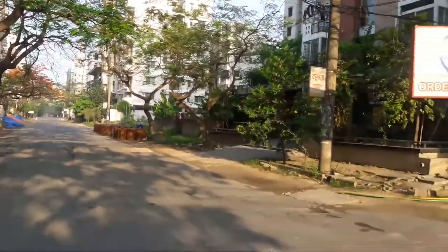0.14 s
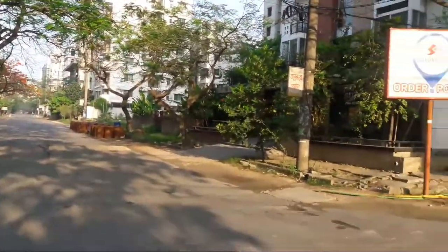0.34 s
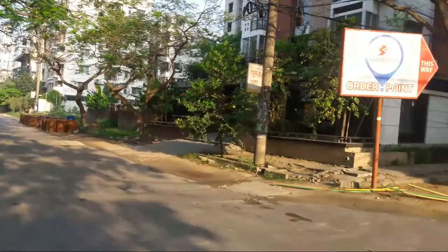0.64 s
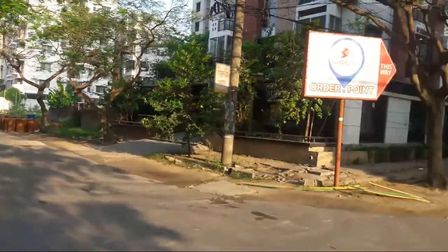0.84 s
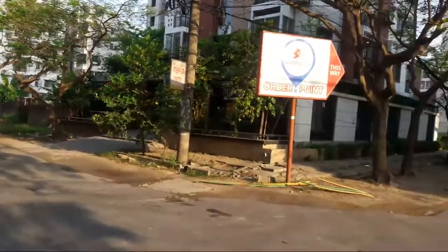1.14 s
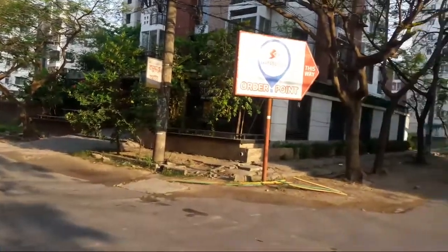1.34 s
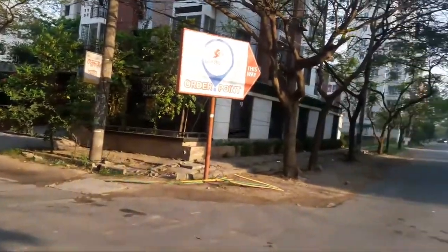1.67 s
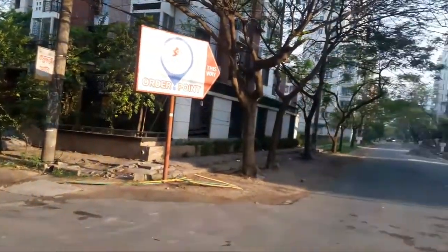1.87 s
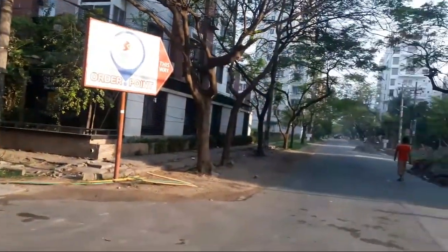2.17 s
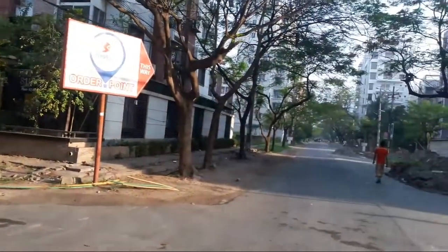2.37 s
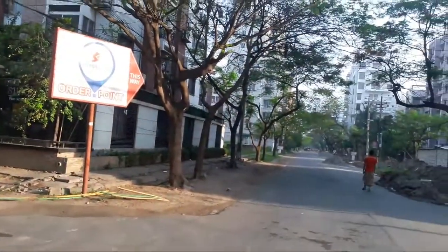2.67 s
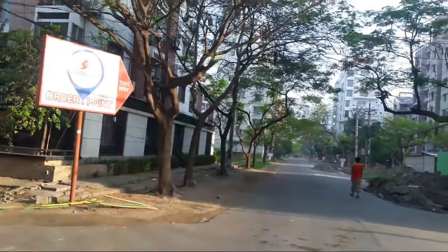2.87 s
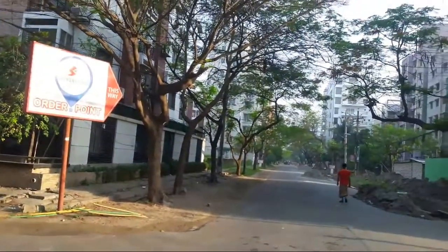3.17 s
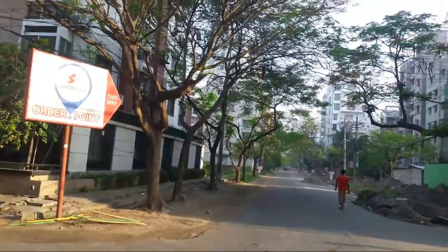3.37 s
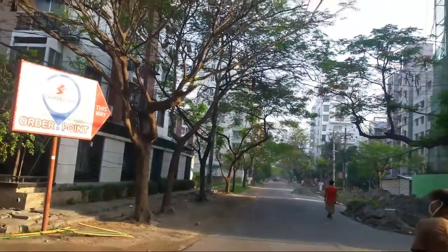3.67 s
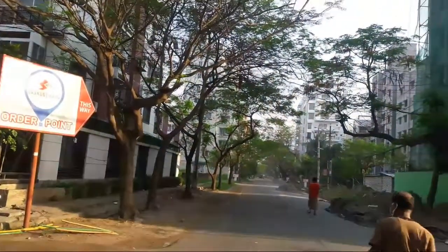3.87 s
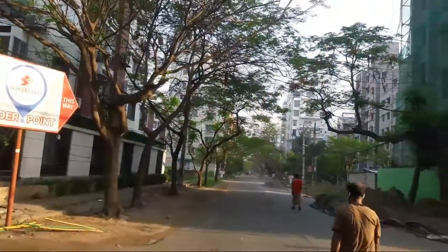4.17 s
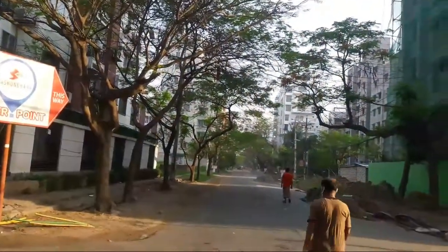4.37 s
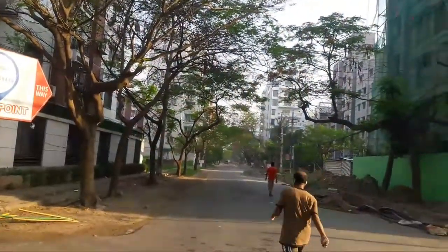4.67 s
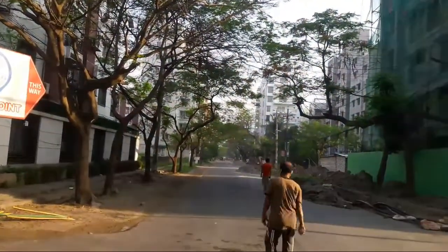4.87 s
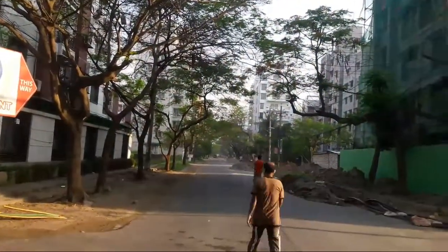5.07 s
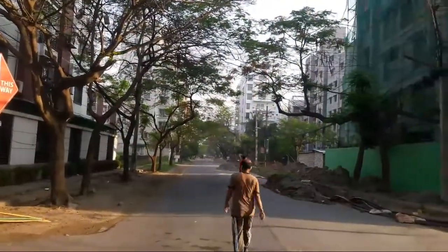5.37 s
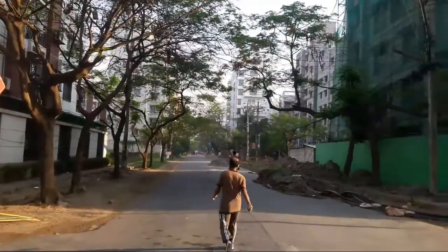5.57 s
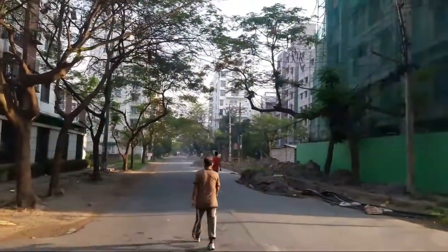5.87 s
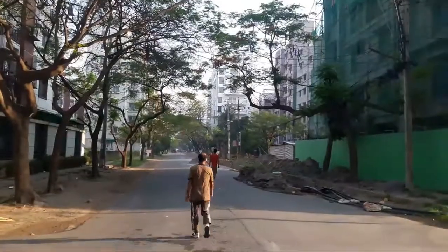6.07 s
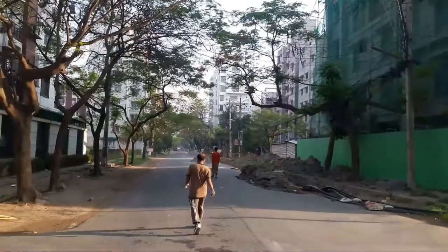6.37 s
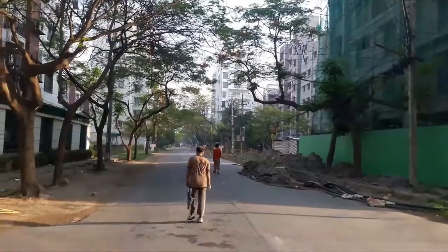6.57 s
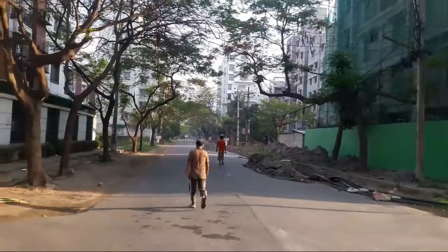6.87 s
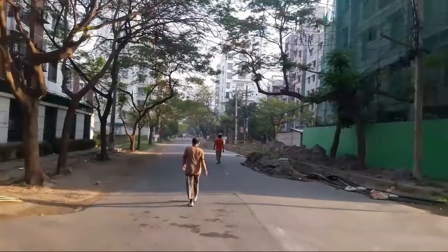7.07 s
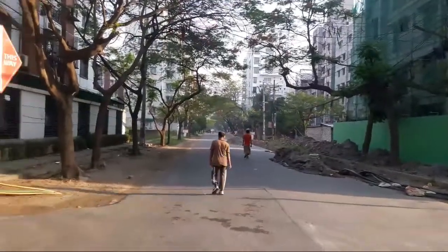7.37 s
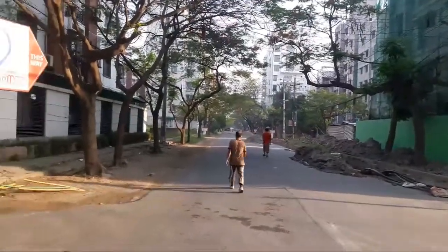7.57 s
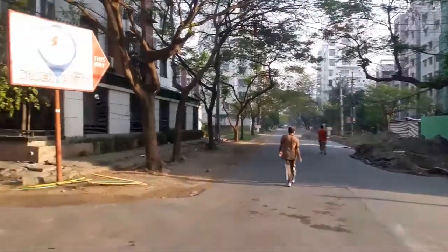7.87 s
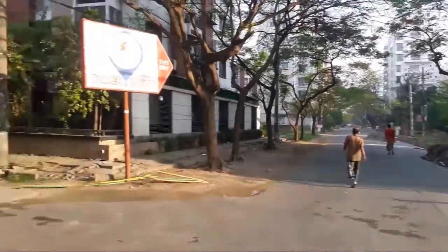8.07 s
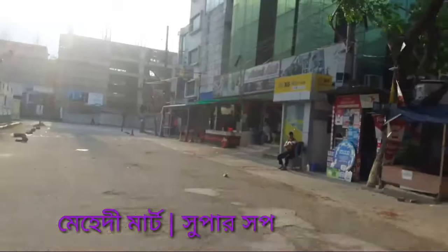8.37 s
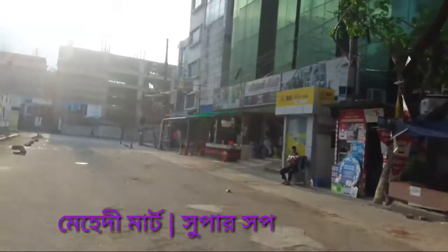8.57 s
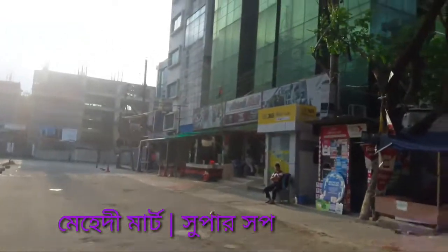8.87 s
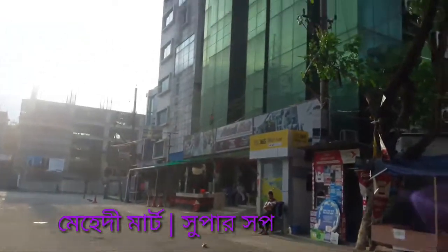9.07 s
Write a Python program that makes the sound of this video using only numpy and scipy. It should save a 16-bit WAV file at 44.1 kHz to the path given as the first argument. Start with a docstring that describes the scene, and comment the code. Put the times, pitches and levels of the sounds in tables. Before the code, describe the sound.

Hoarse sparrow chirps and thin peeps fill a calm tree-lined street, with soft knocks and ticks nearby, before a brief dip and loud wind buffeting.

```python
"""Sparrows and small birds chirp in the trees of a quiet street; house fronts echo, a far hum lies below.
Each note is a gliding near-sine, roughened by noise and a throb. From about 2 s a breeze, lumpy low
noise, buffets the microphone; ticks, knocks and scuffs, short rings and noise bursts, fall close by.
Near 8.6 s the street fades out; a second, windier street of shaped noise fades in under a strong gust
with sharp pops, while a few birds call without echo."""
import sys
import numpy as np
from scipy import signal
from scipy.fft import rfft, irfft, next_fast_len
from scipy.io import wavfile
from scipy.ndimage import uniform_filter1d

SR = 44100
rng = np.random.default_rng(int(sys.argv[2]) if len(sys.argv) > 2 else 0)


def bounce(signal):
    """Save signal as a 16-bit WAV file at the path given by the first command-line argument."""
    frames = np.transpose(np.atleast_2d(signal))
    limited = np.clip(frames, -1, 1)
    pcm = np.round(limited * 32767).astype(np.int16)
    wavfile.write(sys.argv[1], SR, pcm)


N = 406602

# Levels in dB are those at the source, before echo and overall tone.
# Near sparrow's chirps. Each row: start in seconds, then crest, rise, sweep and closing upstroke in dB.
CHIRPS = [(0.427, -45.5, -45, -47, -43.5), (1.074, -38, -51, -51, -44.5), (2.017, -35, -41.5, -36, -36.5),
          (2.636, -35, -38, -39, -40.5), (3.516, -37.5, -36, -39, -34.5), (4.371, -35.5, -36.5, -43, -35.5),
          (4.727, -40, -34.5, -34, -33), (5.918, -36, -43, -46.5, -49), (6.427, -30, -37, -37, -40),
          (7.134, -36, -41, -44, -48.5), (8.091, -25.5, -43, -38.5, -38)]
# Crest, rise, fall, closing upstroke, its overtone, second voice.
# Each row: delay in seconds, length in seconds, start, middle and end pitch in Hz.
CHIRP_PARTS = [(.019, .023, 6700, 7050, 6600), (.002, .023, 3600, 5450, 6800),
               (.028, .046, 4700, 3740, 3800), (.091, .028, 3650, 4200, 5300),
               (.091, .022, 6300, 6900, 7400), (.004, .018, 3750, 4300, 5100)]
# Answering sparrow, upstroke then low arch. Each row: start in seconds, upstroke in dB, arch in dB.
ANSWERS = [(1.024, -42, -50), (2.48, -38.5, -41.5), (3.344, -39.5, -33.5), (4.057, -36, -40.5),
           (4.8, -37, -33), (5.531, -37, -40), (6.211, -32, -36), (7.052, -42.5, -40.5), (8.269, -39, -35)]
# Strokes of the answer. Each holds: length in seconds, start, middle and end pitch in Hz.
UPSTROKE = (.028, 3900, 4200, 4950)
HOOK = (.03, 3900, 4000, 3250)  # lower voice that parts from the upstroke and drops into the arch
LOW_ARCH = (.046, 3200, 4230, 2800)
# Low arch on its own. Each row: start in seconds, level in dB.
LONE_ARCHES = [(0.172, -43.5), (1.774, -41), (6.364, -42.5), (7.999, -41)]
# Steep high arches of the answers. Each row: start in seconds, length in seconds, crest in Hz, level in dB.
HIGH_ARCHES = [(0.111, 0.033, 5650, -40.5), (1.003, 0.019, 6370, -43), (1.717, 0.028, 5830, -43.5),
               (4.035, 0.02, 6400, -41.5), (6.183, 0.034, 5740, -38.5), (7.035, 0.033, 6450, -43.5),
               (7.932, 0.042, 5770, -43.5), (8.245, 0.03, 5300, -48), (9.189, 0.031, 5050, -37)]
# Slides down to a hook. Each row: start in seconds, level in dB.
FALLS = [(0.13, -45), (1.098, -50), (1.738, -42.5), (4.404, -43.5), (5.487, -44), (6.135, -48),
         (7.956, -43)]
# One slide: length in seconds, start, middle and end pitch in Hz.
FALL_STROKE = (0.03, 5300, 3900, 3470)
# Quick hoarse upstrokes. Each row: start in seconds, level in dB.
CHATTER = [(6.292, -52), (6.333, -39), (9.153, -48.5), (9.171, -37.5), (9.185, -39)]
# One upstroke: length in seconds, start, middle and end pitch in Hz.
CHATTER_STROKE = (.022, 3650, 4600, 5500)
# The sparrows' throat favours two bands. Each row: frequency in Hz, gain in dB.
THROAT = [(3000, 0), (4000, 2), (5300, -3), (7000, -1)]
# Thin notes. Each row: start in seconds, length in seconds, middle and end pitch in Hz, level in dB.
PEEPS = [(0.0, 0.019, 4400, 4460, -41.5), (0.32, 0.043, 5800, 5570, -54), (0.74, .035, 5650, 5460, -48.5),
         (0.752, 0.092, 4500, 4420, -50), (0.869, 0.074, 5950, 6000, -43), (1.305, 0.055, 5670, 5410, -47),
         (1.495, 0.013, 6070, 5900, -46.5), (1.612, .019, 6600, 6400, -47), (2.407, 0.029, 5930, 5800, -47),
         (2.872, 0.038, 5980, 5570, -47), (2.93, 0.037, 4600, 5030, -48.5), (3.146, 0.038, 5420, 5800, -50),
         (3.272, 0.062, 5870, 5460, -48.5), (4.292, 0.083, 5620, 5780, -47), (4.78, 0.046, 5700, 5540, -42),
         (4.899, 0.039, 6590, 6630, -48), (5, 0.044, 5320, 5260, -45), (5.415, 0.032, 6840, 6660, -50),
         (5.44, 0.069, 6080, 5800, -45.5), (5.756, 0.053, 6840, 6040, -44), (6.095, 0.048, 6260, 6300, -47),
         (6.299, .04, 5620, 5600, -46), (6.312, 0.052, 6000, 5700, -51), (6.401, 0.037, 6900, 7000, -46),
         (7.003, 0.057, 6600, 6600, -46.5), (7.206, 0.022, 6950, 7300, -36),
         (7.391, 0.04, 5360, 5550, -49.5), (7.42, 0.02, 6150, 6400, -55), (7.85, 0.05, 6630, 6420, -44),
         (8.074, 0.035, 6800, 6740, -44), (8.442, 0.05, 5770, 5400, -41.5)]
# Quick rises. Each row: start in seconds, top pitch in Hz, level in dB.
FLICKS = [(5.756, 6860, -48), (5.843, 6570, -47.5), (8.926, 5400, -46)]
# Lower birds further off. Each row: start in seconds, length in seconds, start and end in Hz, level in dB.
WHISTLES = [(1.622, 0.043, 2000, 2060, -47), (1.675, 0.059, 2186, 2050, -41), (1.8, 0.065, 2124, 2060, -48),
            (1.852, 0.064, 2130, 2340, -48), (1.97, 0.079, 1967, 1990, -50), (2.05, 0.028, 2020, 1920, -44),
            (2.172, 0.02, 3150, 2940, -45), (3.3, 0.058, 590, 640, -53), (3.384, 0.094, 503, 544, -45),
            (5.236, 0.033, 1980, 2000, -50), (5.3, 0.028, 2035, 1987, -46.5),
            (5.356, 0.057, 1960, 1894, -49.5), (5.452, 0.033, 2005, 2020, -47),
            (5.64, 0.025, 2580, 2470, -50), (5.665, 0.057, 2060, 1890, -51),
            (7.478, 0.04, 1943, 1810, -44.5), (7.53, .025, 1830, 2020, -49),
            (7.648, 0.069, 2120, 2420, -51), (7.819, 0.072, 2640, 2400, -48),
            (7.869, 0.056, 1940, 1860, -48), (8.105, 0.037, 2000, 2140, -46),
            (8.184, .025, 1870, 1940, -45.5), (8.197, 0.078, 2470, 2420, -46),
            (8.239, 0.041, 2133, 1840, -40.5), (8.292, 0.017, 1870, 2100, -43),
            (8.379, 0.053, 2080, 1866, -48), (8.427, .045, 1845, 2140, -45.5)]
# Second street, whistles that climb and drop. Each row: start in seconds, share of the pitch, level in dB.
ARCS = [(8.794, 1.05, -47), (8.951, 1.02, -40), (9.112, .965, -41.5)]
# Climb, two overtones, drop. Each row: delay in seconds, length in seconds,
# start, middle and end pitch in Hz before the share, level in dB relative to the whistle.
ARC_PARTS = [(0, .076, 2580, 3130, 3190, 0), (0, .06, 3870, 4560, 4780, -17),
             (.012, .06, 5700, 6250, 6440, -14), (.07, .022, 3200, 2600, 2300, -3)]
# House fronts. Each row: delay in seconds, level in dB.
ECHOES = [(.03, -15), (.068, -12), (.14, -17)]
# Colour of all echoes. Each row: frequency in Hz, gain in dB.
ECHO_TONE = [(2500, -3), (4200, -3), (5300, 1), (7000, -4)]
# Far low warbling. Each row: time in seconds, level in dB, centre in Hz.
WARBLE = [(0.0, -102.5, 2120), (1.459, -58.5, 2053), (1.68, -50.5, 2077), (2.97, -70, 2090),
          (5.719, -57, 2023), (6.419, -67, 1980), (7.499, -56, 1943), (8.43, -53, 1970), (8.6, -58.5, 2010)]
# Level curves of the wind. Each row: time in seconds, level in dB.
BREEZE = [(1.9, -56.5), (2.5, -44), (3.43, -44.5), (3.89, -53), (3.98, -34), (4.39, -55), (4.55, -31.5),
          (4.68, -53), (4.79, -41), (4.93, -47.5), (5.16, -33), (5.2, -41.5), (5.59, -30), (5.84, -47.5),
          (5.96, -32.5), (6.48, -39), (6.68, -29.5), (6.71, -37), (6.89, -32.5), (6.93, -43.5), (7.16, -38),
          (7.6, -53.5), (7.68, -33), (7.76, -61), (7.92, -40.5), (8.3, -78)]
GUST = [(8.708, -45), (8.75, -33), (8.86, -20), (8.92, -20.5), (9.04, -8), (9.11, -8), (9.14, -18.5),
        (9.18, -11.5), (9.22, -17.5)]
# Wind spectra. Each row: frequency in Hz, relative density in dB per Hz.
BREEZE_TONE = [(15, -65.5), (25, -25.5), (74, -1), (130, 0), (292, -11.5), (517, -33), (557, -29.5),
               (900, -39.5), (1170, -70), (1980, -120)]
GUST_TONE = [(15, -73), (25, -32), (75, -6.5), (168, 0.5), (204, 0.5), (238, -2.5), (441, -7), (477, -10),
             (662, -13.5), (2500, -58), (3250, -103), (5500, -120)]
# Sharp pops within the gust. Each row: start in seconds, peak in dB.
POPS = [(8.832, -31.5), (8.9047, -25.5), (8.922, -27), (8.975, -22.5), (9.03, -22), (9.0553, -23),
        (9.074, -29), (9.1014, -29), (9.181, -24.5)]
# Dry ticks near the microphone. Each row: start in seconds, level in dB, centre in Hz, t60 in seconds.
TICKS = [(0.612, -38, 4500, .012), (2.2675, -42, 4170, .015), (3.0497, -36.5, 6570, 0.014),
         (3.1027, -36, 6600, .015), (4.348, -35, 6750, .02), (4.3515, -20, 6700, 0.025),
         (4.4432, -30, 6000, 0.019), (4.4517, -29, 6200, 0.024), (5.189, -44, 6450, .03),
         (5.261, -36.5, 2440, .015), (6.013, -31.5, 6530, 0.024), (7.442, -20, 4100, 0.0057)]
# Dull knocks near the microphone. Each row: start in seconds, level in dB, pitch in Hz.
KNOCKS = [(2.267, -38, 480), (2.679, -29.5, 402), (3.1, -36, 460), (3.217, -35, 505), (3.53, -29.5, 346),
          (7.439, -33.5, 363.5)]
# Swelling hiss, perhaps a shoe on grit. Each row: start in seconds, length in seconds, level in dB.
SCUFFS = [(4.376, 0.13, -33), (7.452, .037, -33)]
# Spectra of scuffs, first street, second street. Each row: frequency in Hz, relative density in dB per Hz.
SCUFF_TONE = [(2500, -20), (5000, 1), (10000, -6), (15500, 11)]
STREET = [(18, -48), (30, -24), (43, -16.5), (93, -1.5), (147, -9), (194, -4), (250, -8.5), (322, -7),
          (996, -15.5), (2280, -12.5), (3080, -18), (3800, -17), (4300, -11.5), (4850, -17.5),
          (6590, -16.5), (7400, -27.5), (9620, -58), (16300, -120)]
SQUARE = [(880, -58), (1500, -18), (2630, -17.5), (3280, -24), (3920, -26.5), (4640, -29), (7400, -18.5),
          (9620, -57), (16300, -120)]
# Hum and whine. Each row: frequency in Hz, level in dB.
HUM = [(96.9, -61.5), (199.2, -53.5), (1380, -65)]
# Overall tone, a steep dip near 8.6 kHz. Each row: frequency in Hz, gain in dB.
OVERALL_TONE = [(7100, -1), (7500, -5.5), (7900, -16.5), (8600, -33.5), (9200, -11), (16000, -39)]
# Spectrum of the faint top hiss. Each row: frequency in Hz, relative density in dB per Hz.
TOP_HISS = [(7900, -32), (8500, -4), (9000, -6), (12000, -6.5), (15500, -9.5)]

HOARSE, THIN, CLEAR = .52, .42, .17  # roughness of sparrows, peeps, whistles
THROB_HZ = 190  # rate in Hz of the throb that roughens the notes
OCTAVE_DB, TWELFTH_DB = -20.5, -17.5  # second and third harmonics
FALL_DB, OVERTONE_DB, SECOND_VOICE_DB = -6, -13.5, -5  # against sweep, closing upstroke, sweep
HOOK_DB, ARCH_DELAY_S = -3, .026  # against and after the upstroke
ARCH_FROM, ARCH_TO = .67, .64  # start and end pitch as shares of the crest
UNDERTONE, UNDERTONE_DB = .72, -5  # second voice under each high arch: share of the crest, level
PEEP_SAG = .03  # share of the middle pitch missing at the start
FLICK_S, FLICK_FROM = .02, .74  # length; start as share of the top
GLIDE_BY_MIDDLE = .75  # share of a whistle's glide done halfway
FLOCK_NOTES, FLOCK_FLOOR_DB, FLOCK_SPREAD_DB = 221, -59, 8
OTHERS_ECHO_DB = -4  # the other birds sit clear of the walls and echo less
SILENT_FROM_S, FADE_OUT_S, BACK_AT_S, FADE_IN_S = 8.606, .26, 8.698, .36
STREET_DB, SQUARE_DB = -48, -46
STREET_DB_PER_S = -.1524  # the far noise slowly gets quieter over the first street
PUFF_EXTRA_GAIN, PUFF_S = .74, .012  # each pop rides on a brief surge of the gust
EDGE_HZ = 15600


def amp(db):
    """Decibels to amplitude."""
    return 10 ** (np.asarray(db) / 20)


def evened(x):
    """Scale to unit RMS."""
    return x / np.sqrt(np.mean(x ** 2) + 1e-20)


def over_hz(points, hz):
    """Interpolate (Hz, dB) points on a log frequency axis."""
    f, value = np.transpose(points)
    return np.interp(np.log(hz + 1), np.log(f + 1), value)


def over_time(s, db):
    """Gain curve, virtually silent outside its span."""
    return amp(np.interp(np.arange(N) / SR, s, db, -200, -200))


def add(mix, s, sound):
    """Add sound in place at s seconds, cut at the end of the mix."""
    part = mix[round(s * SR):][:len(sound)]
    part += sound[:len(part)]


def wobble(hz, size=N):
    """Random motion of about unit spread: noise low-passed at hz."""
    lowpass = signal.butter(2, hz, fs=SR, output="sos")
    run_in = SR // 20
    return evened(signal.sosfilt(lowpass, rng.standard_normal(size + run_in)))[-size:]


def coloured(x, spectrum):
    """Apply a (Hz, dB) gain curve by FFT."""
    size = next_fast_len(N)
    gain = amp(over_hz(spectrum, np.fft.rfftfreq(size, 1 / SR)))
    return irfft(rfft(x, size) * gain, size)[:N]


def note(length_s, start_hz, middle_hz, end_hz, db, rough):
    """Near-sine on a parabola of pitch; roughness adds throb and a noisy band; faint harmonics ride above."""
    u = np.arange(round(length_s * SR)) / (length_s * SR)
    hz = start_hz * (1 - u) * (1 - 2 * u) + 4 * middle_hz * u * (1 - u) + end_hz * u * (2 * u - 1)
    phase = 2 * np.pi * np.cumsum(hz) / SR
    rasp = wobble(350, len(u))
    flutter = rasp * np.sin(phase) + wobble(350, len(u)) * np.cos(phase)
    tone = (np.sin(phase) + rough * flutter) / np.sqrt(1 + 2 * rough ** 2)
    harmonics = amp(OCTAVE_DB) * np.sin(2 * phase) + amp(TWELFTH_DB) * np.sin(3 * phase)
    throb = 1 + rough * np.sin(2 * np.pi * (THROB_HZ * length_s * u + rng.random()))
    return amp(db) * signal.windows.tukey(len(u), .42) * (tone + rasp * harmonics) * throb


def sparrows():
    """Hoarse chirps and answers built of short glides, coloured by the throat."""
    out = np.zeros(N)
    for s, crest, rise, sweep, closing in CHIRPS:
        levels_db = (crest, rise, sweep + FALL_DB, closing, closing + OVERTONE_DB, sweep + SECOND_VOICE_DB)
        for (delay, *shape), db in zip(CHIRP_PARTS, levels_db):
            add(out, s + delay, note(*shape, db, HOARSE))
    for s, upstroke_db, arch_db in ANSWERS:
        add(out, s, note(*UPSTROKE, upstroke_db, HOARSE))
        add(out, s, note(*HOOK, upstroke_db + HOOK_DB, HOARSE))
        add(out, s + ARCH_DELAY_S, note(*LOW_ARCH, arch_db, HOARSE))
    for strokes, shape in ((LONE_ARCHES, LOW_ARCH), (CHATTER, CHATTER_STROKE), (FALLS, FALL_STROKE)):
        for s, db in strokes:
            add(out, s, note(*shape, db, HOARSE))
    for s, length, hz, db in HIGH_ARCHES:
        add(out, s, note(length, ARCH_FROM * hz, hz, ARCH_TO * hz, db, HOARSE))
        add(out, s, note(length, *[UNDERTONE * hz] * 3, db + UNDERTONE_DB, HOARSE))
    return coloured(out, THROAT)


def flock():
    """Faint sparrow notes from trees down the first street, at random times, pitches and levels."""
    out = np.zeros(N)
    for when, pitch, a, b, loud in rng.random((FLOCK_NOTES, 5)):
        hz = 4150 + 2600 * pitch ** 4
        db = FLOCK_FLOOR_DB + FLOCK_SPREAD_DB * loud
        add(out, when * SILENT_FROM_S, note(.03, hz * (.92 + .16 * a), hz, hz * (.92 + .16 * b), db, HOARSE))
    return coloured(out, THROAT)


def small_birds():
    """Thin peeps and flicks, clear low whistles and arcs: less rough glides."""
    out = np.zeros(N)
    for s, length, hz, end_hz, db in PEEPS:
        add(out, s, note(length, (1 - PEEP_SAG) * hz, hz, end_hz, db, THIN))
    for s, hz, db in FLICKS:
        add(out, s, note(FLICK_S, FLICK_FROM * hz, (1 + FLICK_FROM) / 2 * hz, hz, db, THIN))
    for s, length, hz, end_hz, db in WHISTLES:
        middle_hz = hz + GLIDE_BY_MIDDLE * (end_hz - hz)
        add(out, s, note(length, hz, middle_hz, end_hz, db, CLEAR))
    for s, share, db in ARCS:
        for delay, length, *hz, relative_db in ARC_PARTS:
            add(out, s + delay, note(length, *(share * np.array(hz)), db + relative_db, CLEAR))
    return out


def smear(size):
    """Noise burst of unit energy under a smooth bump."""
    burst = signal.windows.hann(size) * rng.standard_normal(size)
    return burst / np.linalg.norm(burst)


def street_echo(near, others, t60_s=.45, tail_db=-2.5, branches_db=-6):
    """Branches scatter each note at once; house fronts slap it back, smeared; a tail follows."""
    t = np.arange(SR // 2) / SR
    tail = rng.standard_normal(len(t)) * amp(-60 * t / t60_s) * np.minimum(t / .015, 1)
    reply = amp(tail_db) * tail / np.linalg.norm(tail)
    for delay, db in ECHOES:
        add(reply, delay, amp(db) * smear(600))
    add(reply, 0, amp(branches_db) * smear(500))
    first_street = np.arange(N) / SR < SILENT_FROM_S  # only this one is walled in
    walled = (near + amp(OTHERS_ECHO_DB) * others) * first_street
    return near + others + coloured(signal.oaconvolve(walled, reply)[:N], ECHO_TONE)


def warble(width_hz=150):
    """A wavering tone with a noisy envelope, like many overlapping notes blurred by distance."""
    s, db, hz = np.transpose(WARBLE)
    wavering_hz = np.interp(np.arange(N) / SR, s, hz) + 45 * wobble(7)
    phase = 2 * np.pi * np.cumsum(wavering_hz) / SR
    blur = wobble(width_hz) * np.sin(phase) + wobble(width_hz) * np.cos(phase)
    return over_time(s, db) * blur * amp(1.1 * wobble(7.6))


def wind(curve, spectrum, lumpy_db, lump_hz, split_hz, brighten):
    """Eddies hit the port in uneven lumps; the upper part of the thump grows faster than the level."""
    eddies = rng.standard_normal(N) * amp(lumpy_db * np.tanh(wobble(lump_hz)))
    thump = evened(coloured(eddies, spectrum))
    level = over_time(*np.transpose(curve))
    dull = coloured(thump, [(split_hz / 2, 0), (split_hz * 2, -30)])
    return level * (dull + (thump - dull) * (level / level.max()) ** brighten)


def puffs():
    """Gain of the gust, surging briefly around each pop."""
    gain = np.ones(N)
    for s, _ in POPS:
        add(gain, s - PUFF_S / 3, PUFF_EXTRA_GAIN * signal.windows.hann(round(PUFF_S * SR)))
    return gain


def pops(lowest_hz=1500):
    """Short snaps of the membrane: decaying sines, pitch random within a tenth."""
    out, t = np.zeros(N), np.arange(300) / SR
    for s, db in POPS:
        hz = lowest_hz * rng.uniform(1.0, 1.1)
        add(out, s, amp(db - 60 * t / 0.0063) * np.sin(2 * np.pi * hz * t))
    return out


def ticks():
    """Each a noise burst a few ms long with a short ring."""
    out, t = np.zeros(N), np.arange(400) / SR
    for s, db, hz, t60_s in TICKS:
        ring = np.sin(2 * np.pi * hz * t) + 1.44 * rng.standard_normal(len(t))
        add(out, s, amp(db - 60 * t / t60_s) * np.minimum(t / 0.00037, 1) * ring)
    return coloured(out, [(1200, -20.0), (4500, -3)])


def knocks():
    """Short low rings: quickly decaying sines."""
    out, t = np.zeros(N), np.arange(3000) / SR
    for s, db, hz in KNOCKS:
        add(out, s, amp(db - 60 * t / 0.02) * np.minimum(t / 0.0013, 1) * np.sin(2 * np.pi * hz * t))
    return out


def scuffs():
    """Bright noise that grows and is cut short."""
    level = np.zeros(N)
    for s, length, db in SCUFFS:
        add(level, s, amp(db) * np.linspace(.5, 1, round(length * SR)))
    return level * evened(coloured(rng.standard_normal(N), SCUFF_TONE))


def ambience(spectrum, db, patchy_db=1.5):
    """Far traffic, leaves and chatter: shaped noise, its level patchy over time and frequency."""
    real, imaginary, patches = rng.standard_normal((N // 128 + 5, 257, 3)).T
    patches = evened(uniform_filter1d(uniform_filter1d(patches, 6, 0), 24, 1))
    bins = (real + 1j * imaginary) * amp(patchy_db * patches)
    noise = signal.istft(bins, nperseg=512, noverlap=384)[1][:N]
    return amp(db) * evened(coloured(noise, spectrum))


def hum():
    """Mains hum and a thin whine: sines wavering in level and phase."""
    t = np.arange(N) / SR
    out = np.zeros(N)
    for hz, db in HUM:
        out += amp(db + 3.1 * wobble(7.1)) * np.sin(2 * np.pi * hz * t + .5 * wobble(2.7))
    return out


def scene():
    """Two streets in turn; wind, ticks, scuffs and knocks bypass the fades."""
    t = np.arange(N) / SR
    first = np.clip((SILENT_FROM_S - t) / FADE_OUT_S, 0, 1)
    second = np.clip((t - BACK_AT_S) / FADE_IN_S, 0, 1)
    birds = street_echo(sparrows() + flock(), small_birds()) + warble()
    breeze = wind(BREEZE, BREEZE_TONE, lumpy_db=7.2, lump_hz=34.4, split_hz=290, brighten=.75)
    gust = wind(GUST, GUST_TONE, lumpy_db=5.1, lump_hz=90, split_hz=620, brighten=.38) * puffs()
    close_by = ticks() + scuffs() + knocks()
    quiet = (ambience(STREET, STREET_DB) + hum()) * amp(STREET_DB_PER_S * t) * first
    windy = ambience(SQUARE, SQUARE_DB) * second
    return (birds * (first + second) + close_by + quiet + windy + breeze + gust + pops())[None]


def record(dry):
    """Overall tone: steep dip near 8.6 kHz, faint hiss above following the treble; then the band limit."""
    heard = coloured(np.tanh(dry[0]), OVERALL_TONE)  # the membrane rounds off the strongest thumps
    treble = coloured(heard, [(4000, -37.5), (5500, -1.5)])
    level = np.sqrt(abs(uniform_filter1d(treble ** 2, 900))) ** 0.59  # compressed
    hiss = amp(-45.0) * level * evened(coloured(rng.standard_normal(N), TOP_HISS))
    band_limit = signal.firwin(511, EDGE_HZ, window=("kaiser", 9), fs=SR)
    return signal.oaconvolve((heard + hiss)[None], band_limit[None], "same")


dry = scene()
out = record(dry)
bounce(out)
```